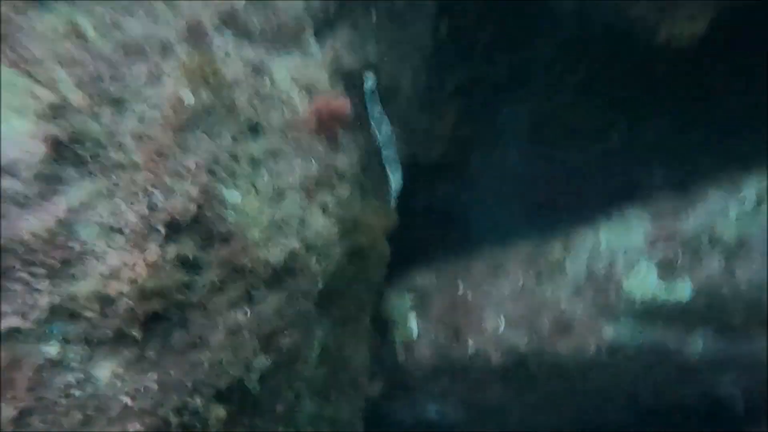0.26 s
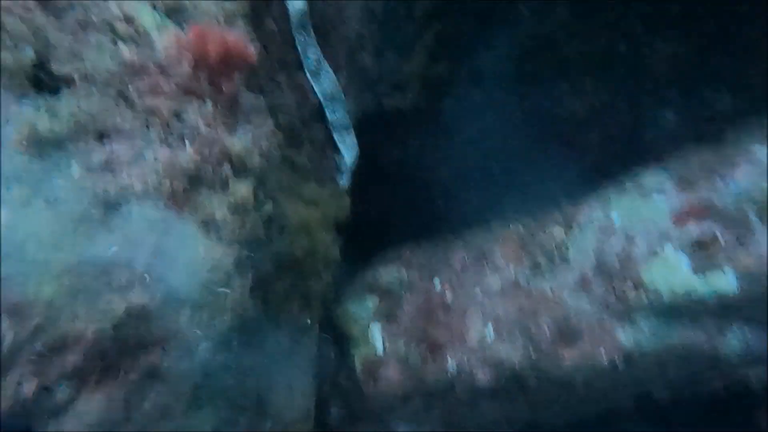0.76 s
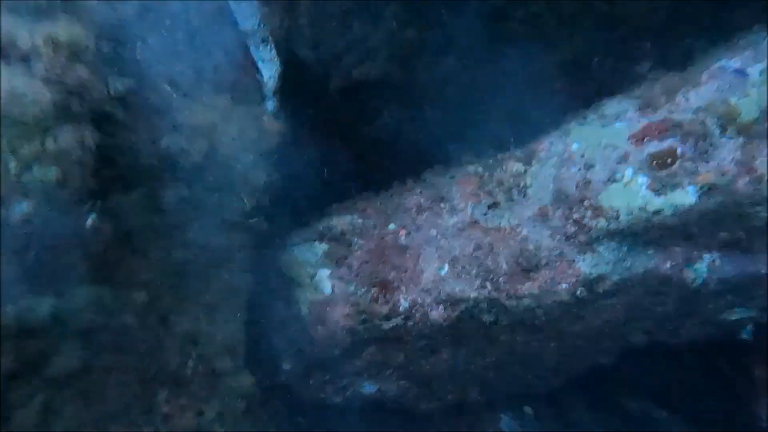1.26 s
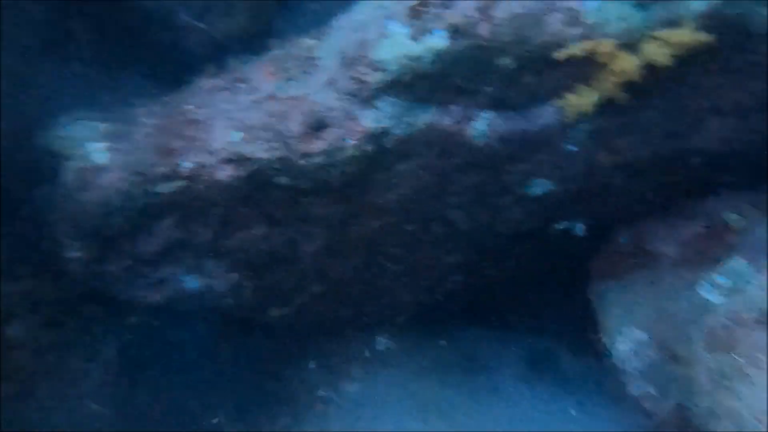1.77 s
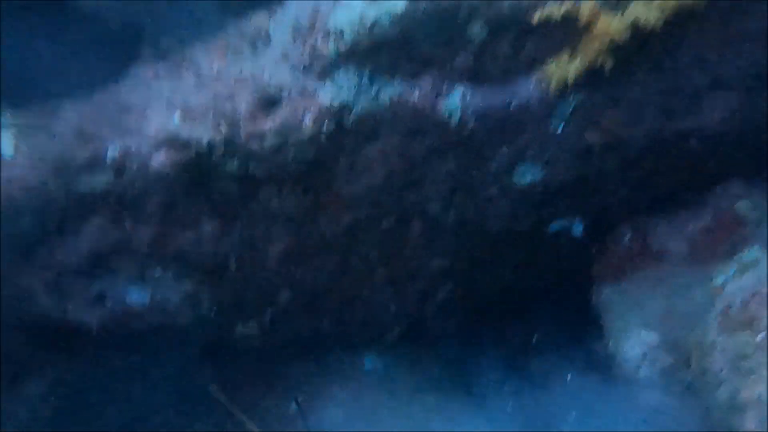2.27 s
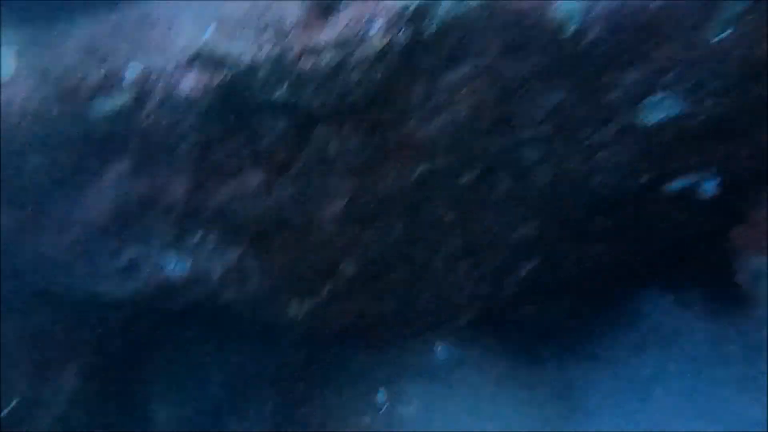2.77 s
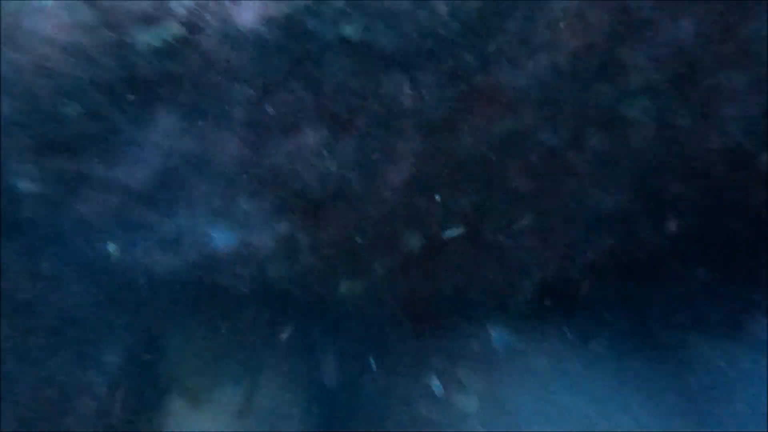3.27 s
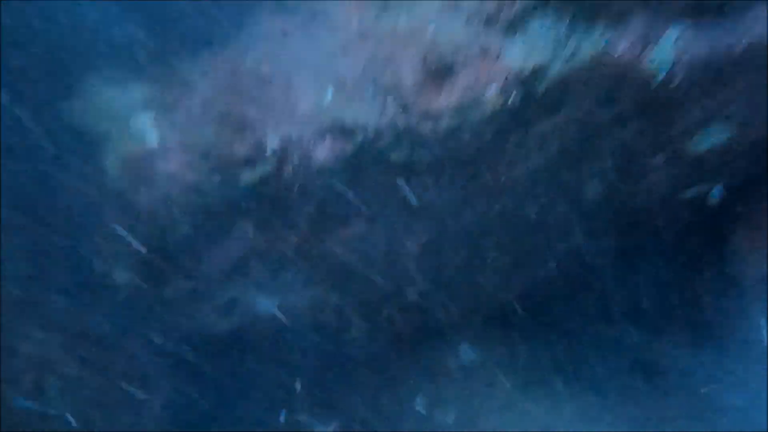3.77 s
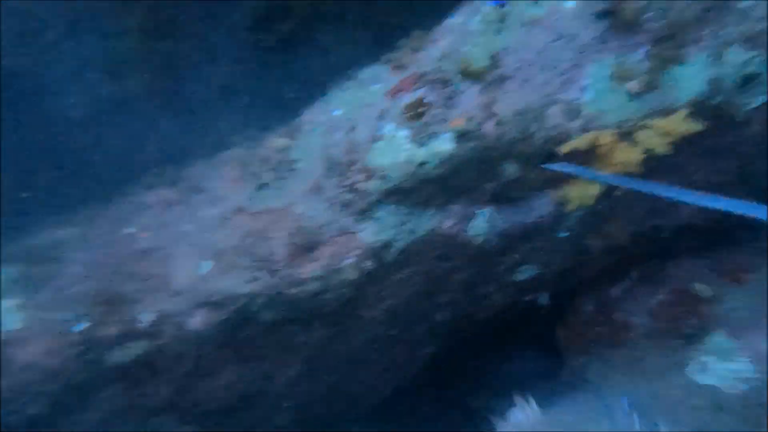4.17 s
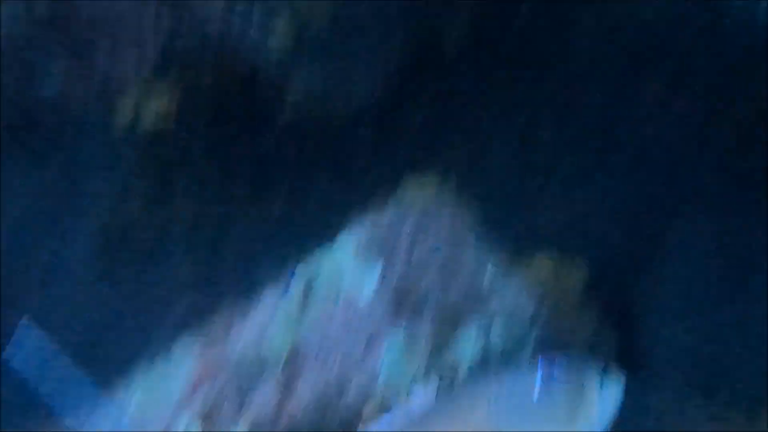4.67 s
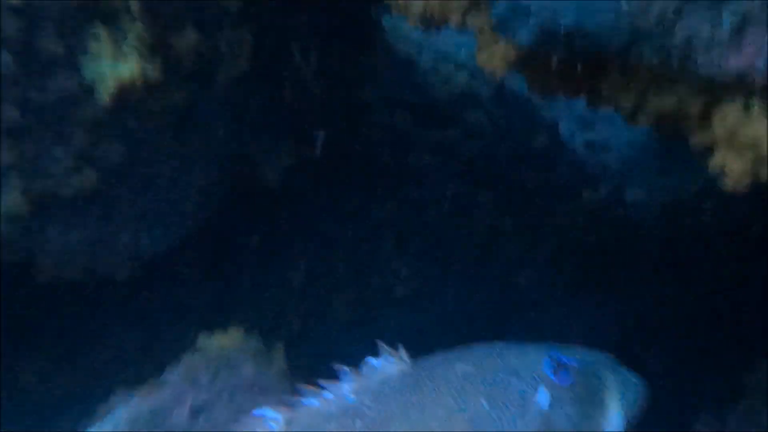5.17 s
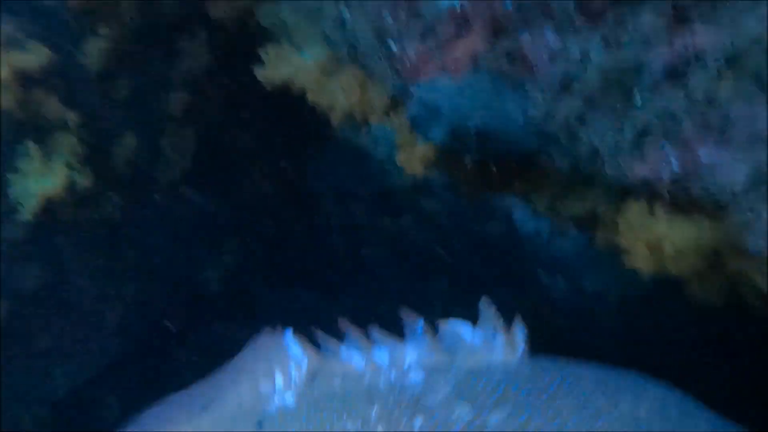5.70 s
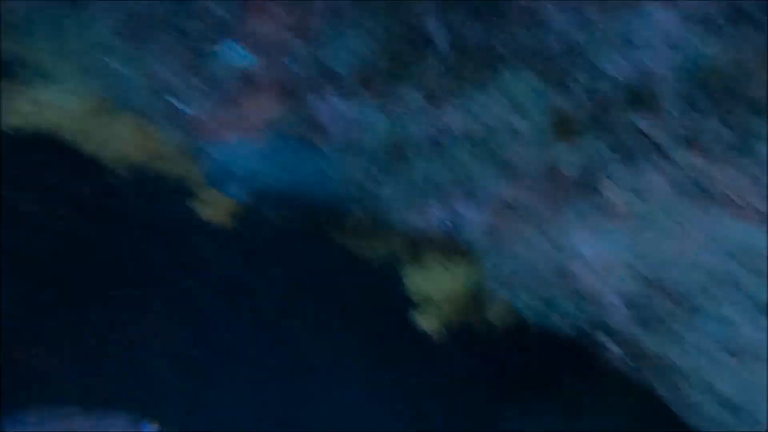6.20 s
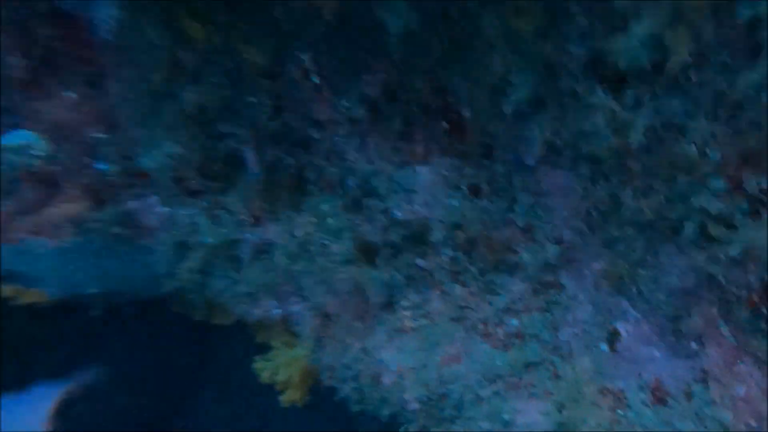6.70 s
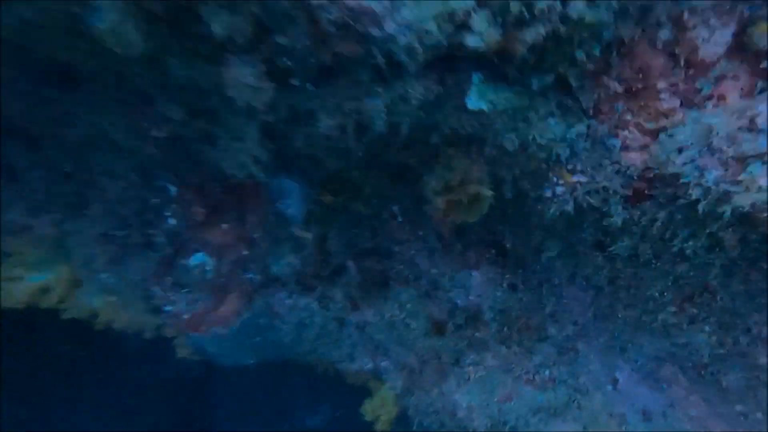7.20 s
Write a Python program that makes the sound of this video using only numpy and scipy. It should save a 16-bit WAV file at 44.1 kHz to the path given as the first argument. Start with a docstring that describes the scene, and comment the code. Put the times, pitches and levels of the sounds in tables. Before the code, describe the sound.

Underwater, a hard knock and deep thumps hit a camera case over low surging, gurgling water, with gritty scraping and sharp little clicks.

```python
"""Thumps and knocks on a waterproof camera case that a diver pushes through a gap between rocks.
Blows are short damped swings: low for the case in water, higher for its wall and its hollow.
Clicks are bursts of noise through the case's resonances; groans are wavering stick-slip tones.
Sand and gear rub with a gritty hiss of random grains, in a continuous, changing layer and in strokes.
Behind them water surges as low noise, and gurgles and booms as many small gliding gulps."""
import sys
import numpy as np
from scipy import signal
from scipy.fft import rfft, irfft
from scipy.io import wavfile
from scipy.ndimage import uniform_filter1d

SR = 44100
rng = np.random.default_rng(int(sys.argv[2]) if len(sys.argv) > 2 else 0)


def to_wav(s):
    """Save 16-bit WAV."""
    ch = np.atleast_2d(s).T  # columns
    pcm = np.round(np.clip(ch, -1, 1) * 32767)  # PCM
    wavfile.write(sys.argv[1], SR, pcm.astype(np.int16))


N = 328545
TIME_S = np.arange(N) / SR
HZ = np.fft.rfftfreq(8192, 1 / SR)

# water round the case, before trim and swell: (time [s], slow surge [dB], quicker churn [dB])
WATER_FLOW = [(0.1, -25, -33), (0.43, -29, -36), (2.69, -29.5, -37), (3.46, -36, -41.5), (3.99, -33.5, -39),
              (4.7, -31.5, -35.5), (5.22, -34.5, -42.5), (5.65, -31, -37.5), (6.27, -35.5, -46),
              (6.55, -35, -40.5), (6.85, -36, -51.5), (7.42, -33.5, -37.5)]
# background rubbing, rising and falling, before trim: (time [s], dull scrape [dB], gritty hiss [dB])
BACKGROUND_RUB = [(0.0, -46, -49.5), (0.42, -48.5, -56.5), (0.8, -51.5, -58), (1.22, -52, -56),
                  (1.6, -44.5, -52), (2.05, -54.5, -55.5), (3.15, -56, -59.5), (4.85, -55, -61),
                  (6.25, -57, -62), (7.07, -58.5, -60), (7.45, -51.5, -53)]
# strokes of rubbing: (time [s], length [s], level [dB], brightness [dB/octave])
RUB_STROKES = [(0.11, 0.025, -40, -2.5), (0.667, 0.11, -44, -1), (0.811, 0.073, -45.5, -4),
               (1.099, 0.022, -40.5, -2), (1.267, 0.17, -49.5, -4), (1.956, 0.098, -52.5, 0.5),
               (2.342, 0.42, -50, 1.5), (2.92, 0.11, -50, 1.5), (3.571, 0.15, -66, 22),
               (3.812, 0.088, -51.5, 0), (4.046, 0.077, -46, 1), (4.86, 0.19, -52, 0),
               (5.071, 0.11, -47, 0.5), (5.468, 0.12, -53, 9.5), (5.806, 0.11, -47.5, 0.5),
               (6.323, 0.085, -48.5, -3)]
# soft bumps: (time [s], nominal peak [dB], base pitch [Hz], hollow's ringing [dB])
CASE_THUMPS = [(0.3322, -11.5, 112, -42), (0.441, -11.5, 29.8, -49), (0.494, -18.5, 202, -28),
               (0.5242, -16, 50, -37), (0.711, -11.5, 58, -32), (0.7445, -7.5, 145, -14.5),
               (0.7602, -12.5, 43.3, -47), (0.8288, -14.5, 35.7, -31), (1.0176, -13.5, 109, -39),
               (1.2687, -11, 117, -29), (1.3994, -31, 150, -26), (2.098, -12, 35.2, -35),
               (2.3688, -16, 56.4, -49), (2.4616, -17, 44, -14.5), (2.7138, -7, 110.6, -14),
               (2.84, -24, 247, -26.5), (2.9254, -19.5, 183, -30.5), (3.401, -17.5, 45, -29.5),
               (3.8883, -12.5, 51, -49), (4.1353, -18.5, 125, -25.5), (4.7322, -19.5, 178, -26.5),
               (5.1078, -11.5, 52.6, -43), (5.2753, -32, 47.6, -26), (5.38, -17, 156, -32.5),
               (5.6419, -22.5, 36, -23), (5.731, -32, 290, -40), (5.802, -15, 103, -39),
               (5.954, -9, 110.6, -49), (5.975, -11, 81, -39), (6.0164, -9.5, 131, -15.5),
               (6.1575, -9, 88.3, -37.5), (6.498, -15.5, 219, -15.5), (6.8888, -18, 221, -35),
               (6.917, -12.5, 158, -17.5), (7.0205, -31, 50.3, -31), (7.119, -13, 66, -58),
               (7.2102, -17, 142, -43), (7.3009, -20, 135, -29)]
# hard, dull contacts: (time [s], nominal peak [dB], wall pitch [Hz], hollow's ringing [dB])
WALL_KNOCKS = [(0.18, -38, 920, -25), (0.335, -27, 1500, -51), (0.755, -25, 1430, -46),
               (0.832, -35, 920, -27.5), (0.8478, -19.5, 1520, -22), (0.864, -18, 1610, -19),
               (1.103, -33, 1330, -43), (1.475, -28.5, 1040, -33), (1.8465, -33, 1450, -54),
               (2.636, -33.5, 850, -39), (3.255, -35.5, 1010, -34), (4.433, -37, 1240, -33),
               (4.7317, -36, 696, -32.5), (4.837, -33, 1110, -28.5), (4.852, -28.5, 1010, -46),
               (4.871, -28, 1040, -23.5), (4.885, -37, 1030, -41), (5.591, -31.5, 1010, -34),
               (6.1458, -36.5, 1430, -48), (6.889, -39.5, 790, -30.5), (7.025, -34, 1410, -34.5),
               (7.22, -28, 1570, -59)]
# ticks of grit and gear: (time [s], nominal peak [dB], centre [Hz], scatter re crush [dB])
GRIT_CLICKS = [(0.122, -32, 5400, -12), (0.2643, -35, 5900, -11), (0.293, -33.5, 4440, -6),
               (0.332, -36.5, 4900, -14), (0.352, -30, 4900, -21), (0.4605, -31.5, 5850, -29),
               (0.5417, -31.5, 4620, -6), (0.755, -33, 5030, -24), (1.6613, -34, 4970, -1),
               (1.888, -30, 6300, -37), (1.9714, -35, 5640, -22), (2.0088, -25, 5330, -34),
               (2.4772, -31.5, 5600, -34), (2.6373, -34.5, 4600, -8), (2.929, -37.5, 4200, -16),
               (3.821, -36, 3570, -13), (4.488, -32.5, 2770, -6), (4.788, -44, 5500, -27),
               (4.829, -38, 4950, -7), (6.053, -39.5, 5850, -30), (5.637, -35, 6250, -6),
               (5.823, -20, 4870, -23), (5.924, -33, 3100, -1), (6.427, -28, 4400, -22),
               (7.025, -27.5, 4730, -22), (7.137, -33, 5800, -23), (7.2205, -24.5, 3500, -10.5),
               (7.3698, -35, 5160, -11)]
# firm rubs: (time [s], length [s], hum before pressure [dB], mean pitch [Hz], whine before pressure [dB])
CASE_GROANS = [(6.322, 0.079, -32.5, 313, -54), (6.326, 0.11, -30.5, 179, -61.5),
               (6.44, 0.36, -38.5, 210, -60.5), (7.372, 0.17, -22.5, 204, -52.5)]
# wall modes that whine: (frequency before glide [Hz], level [dB])
WHINE_MODES = [(460, -1), (930, -1.5), (1570, 0.5)]
# shifts of grip that make the case boom: (time [s], level before rise and decay [dB], decay time [s])
GRIP_SHIFTS = [(1.611, -31, 0.12), (2.824, -18, 0.027), (4.54, -34.5, 0.19)]
# colour of the surge: (frequency [Hz], gain [dB])
SURGE_COLOUR = [(10, -13.5), (22, 2.5), (48, 1.5), (75, -10.5), (130, -40.5), (500, -100)]
# colour of the dull scrape: (frequency [Hz], gain [dB])
SCRAPE_COLOUR = [(250, -15), (450, -0.5), (690, -8.5), (1100, -9), (1560, -1), (1950, -18.5), (2800, -23),
                 (12000, -92.5)]
# colour of gritty hiss and crackle: (frequency [Hz], gain [dB])
GRIT_COLOUR = [(900, -25), (2000, -7), (2900, 0.5), (4200, -2.5), (7200, -6.5), (8800, -6), (9900, -23),
               (12800, -26), (15000, -66)]
# resonances of the case: (frequency [Hz], width [Hz], lift [dB])
CASE_MODES = [(810, 30, 5), (950, 127, 6.5), (1440, 510, 2), (3350, 330, 5), (5022, 270, 17.5),
              (6060, 460, 7.5), (7020, 560, 8)]
# stereo spread: (frequency [Hz], side re mid [dB])
SIDE_RE_MID = [(100, -43), (260, -29.5), (600, -3), (1400, -12.5), (2400, 0), (4500, -9), (9000, -11.5)]
# stereo balance: (frequency [Hz], left re right [dB])
LEFT_RE_RIGHT = [(150, 0), (450, 2), (740, -1), (1300, 0), (2500, 4.5), (3400, 3), (5200, -2), (8000, 2),
                 (12000, 0)]

# trims
SURGE_DB, CHURN_DB, SCRAPE_DB, HISS_DB = 4, 5.5, 1, 1.5
# boom when the churn column is at CHURN_REF_DB; share of that column's dB changes it follows
BOOM_DB, BOOM_FOLLOWS, CHURN_REF_DB = -44.5, 0.62, -36
GRIP_RISE_S = 0.096
# hollow of the case: base pitch, time to peak
HOLLOW_HZ, HOLLOW_RISE_S = 310.2, 0.0071
# a bump's envelope peaks after this many cycles of its base pitch
RISE_CYCLES = 0.81
# waver of the whine's pitch, rms share
WALL_WAVER = 0.028
BAND_LIMIT_HZ = 15700


def amp(db):
    """Decibels to gain."""
    return 10 ** (np.asarray(db) / 20)


def evened(x):
    """Scales to rms 1."""
    return x / np.sqrt(np.mean(x ** 2) + 1e-20)


def read(points, hz):
    """Reads a spectrum table on a log-frequency axis."""
    f, value = np.transpose(points)
    return np.interp(np.log(hz + 1), np.log(f + 1), value)


def level(table, axis):
    """One dB column of a time table as a gain for every sample."""
    columns = np.transpose(table)
    return amp(np.interp(TIME_S, columns[0], columns[axis]))


def add(mix, time_s, sound):
    """Mixes a sound in at the given time."""
    part = mix[max(round(time_s * SR), 0):][:len(sound)]
    part += sound[:len(part)]


def colour(x, db):
    """Minimum-phase filter with the given gain over HZ: resonances ring after each impulse."""
    log_gain = np.log(amp(np.maximum(db, db.max() - 100)))
    circle = np.concatenate([log_gain, log_gain[-2:0:-1]])
    response = np.exp(np.conj(signal.hilbert(circle)))
    taps = np.fft.ifft(response).real[:len(HZ)]
    return signal.oaconvolve(x, taps)[:len(x)]


def wander(rate_hz):
    """Smooth random drift of rms 1, mostly slower than the rate."""
    hz = np.fft.rfftfreq(N, 1 / SR)
    shape = hz / (hz + 2) * np.exp(-(hz / rate_hz) ** 2)
    return evened(irfft(rfft(rng.standard_normal(N)) * shape, N))


def hump(centre_hz, octaves):
    """A broad resonance as a gain over HZ."""
    return np.exp(-(np.log2((HZ + 1) / centre_hz) / octaves) ** 2)


def case_db():
    """The case's resonances as a dB gain over HZ: each mode lifts a band round its frequency."""
    lift = sum((amp(db) - 1) / np.hypot(1, 2 * (HZ - hz) / width_hz) ** 2
               for hz, width_hz, db in CASE_MODES)
    return 20 * np.log10(1 + lift)


def swing(hz, u, sag):
    """Damped cycles whose envelope peaks where u is 1, their pitch sagging as they go."""
    turns = np.cumsum(hz * (1 + sag * np.tanh(1 - u))) / SR
    return (u * np.exp(1 - u)) ** 2 * np.sin(2 * np.pi * turns)


def gurgle(centre_hz, octaves, cycles, spread_db, count, glide=0.19):
    """Separate gulps of water at uneven times, each with its own pitch, glide and strength."""
    out, t = np.zeros(N), np.arange(SR // 8) / SR
    chances = 2 * np.tanh(rng.standard_normal((count, 4)) / 2)
    for k, (late, pitch, size, bend) in enumerate(chances):
        hz = centre_hz * 2 ** (octaves * pitch)
        time_s = (k + late / 2) / count * N / SR
        add(out, time_s, amp(spread_db * size) * swing(hz, t * hz / cycles, glide * bend))
    return evened(out)


def handling():
    """Gain of the case's boom: a little with the churning water, more after each shift of grip."""
    push = amp(BOOM_DB) * (level(WATER_FLOW, axis=2) / amp(CHURN_REF_DB)) ** BOOM_FOLLOWS
    for time_s, db, decay_s in GRIP_SHIFTS:
        t = np.maximum(TIME_S - time_s, 0)
        push = np.hypot(push, amp(db) * np.minimum(t / GRIP_RISE_S, 1) * np.exp(-t / decay_s))
    return push


def water():
    """Slow pressure swings, gulping eddies and the hollow's higher gurgle, all swelling together."""
    swell = amp(2.02 * wander(rate_hz=13.2))
    surge = evened(colour(rng.standard_normal(N), read(SURGE_COLOUR, HZ)))
    surge = amp(SURGE_DB) * level(WATER_FLOW, axis=1) * surge
    churn = gurgle(centre_hz=103.2, octaves=0.47, cycles=0.72, spread_db=4.5, count=420)
    churn = amp(CHURN_DB) * level(WATER_FLOW, axis=2) * churn
    boom = handling() * gurgle(centre_hz=275.0, octaves=0.28, cycles=1.46, spread_db=4.0, count=900)
    return swell * (surge + churn + boom)


def grains(per_s, spread_db, smooth):
    """Tiny impacts of very unequal size over a smooth sliding noise."""
    size = amp(spread_db * np.minimum(rng.exponential(1, N), 4))
    hits = size * rng.choice([-1, 1], N) * (rng.random(N) < per_s / SR)
    return evened(evened(hits) + smooth * rng.standard_normal(N))


def patchy(x, depth_db, size):
    """The point of contact keeps shifting, so patches of the spectrum swell and fade."""
    z = signal.stft(x, nperseg=size)[2]
    patches = uniform_filter1d(rng.standard_normal(z.shape), size=5, axis=0)
    patches = uniform_filter1d(patches, size=4, axis=1)
    return evened(signal.istft(z * amp(depth_db * evened(patches)), nperseg=size)[1][:N])


def rubbing(arch=0.22, peak_early=0.18, ring=0.98):
    """Grains catch and slip in spurts and ring the case; each stroke swells, crackles and eases off."""
    spurts = wander(rate_hz=28)
    coarse = grains(per_s=500, spread_db=2.5, smooth=1.0)
    coarse = coarse * amp(2.9 * spurts + 1.4 * wander(rate_hz=49))
    fine = grains(per_s=780, spread_db=7, smooth=1.6) * amp(2.8 * spurts)
    crackle = grains(per_s=760, spread_db=10.0, smooth=0.86) * amp(2.6 * wander(rate_hz=17.6))
    grit_db = read(GRIT_COLOUR, HZ)
    scrape = patchy(colour(coarse, read(SCRAPE_COLOUR, HZ) + case_db()), depth_db=3.5, size=1024)
    hiss = patchy(colour(fine, grit_db + case_db()), depth_db=3.3, size=512)
    loose = patchy(colour(crackle, grit_db + ring * case_db()), depth_db=4, size=512)
    out = amp(SCRAPE_DB) * level(BACKGROUND_RUB, axis=1) * scrape
    out += amp(HISS_DB) * level(BACKGROUND_RUB, axis=2) * hiss
    for time_s, length_s, db, bright_db in RUB_STROKES:
        u = np.linspace(0, 1, round(max(length_s, .01) * SR))
        start = rng.integers(N // 2)
        sand = evened(scrape[start:][:len(u)]) + evened(loose[start:][:len(u)])
        # finer grains shift the sound upwards
        sand = colour(sand, bright_db * np.log2(np.clip(HZ, 1500, 12000)))
        pressure = abs(np.sin(np.pi * u ** peak_early)) ** arch
        pressure = pressure * np.minimum(u * length_s / .008, 1)
        add(out, time_s, amp(db) * evened(pressure * sand))
    return out


def groans(glide=0.0776, glide_s=0.0213, waver=0.029, rough_db=5.5, catch_s=0.0072, overtone_db=-8):
    """Stick-slip sustains a low, wavering tone; the wall's modes whine and rise as the rub tightens."""
    out, slips = np.zeros(N), wander(rate_hz=50)

    def tone(hz, unsteady, flutter_db):
        """A sine of rms 1 whose pitch and strength waver with the slips."""
        bend, grip = (slips[start:][:len(hz)] for start in rng.integers(N // 2, size=2))
        turns = np.cumsum(hz * (1 + unsteady * bend)) / SR
        return evened(amp(flutter_db * grip) * np.sin(2 * np.pi * turns))

    for time_s, length_s, db, hz, whine_db in CASE_GROANS:
        t = np.arange(round(length_s * SR)) / SR
        tighten = 1 - glide * np.exp(-t / glide_s)
        # each whining mode is a pair of unsteady tones that beat together
        whine = sum(amp(mode_db) * tone(mode_hz * tighten, WALL_WAVER, rough_db)
                    for mode_hz, mode_db in 2 * WHINE_MODES)
        hum = tone(np.full(len(t), hz), waver, rough_db)
        hum = hum + amp(overtone_db) * tone(HOLLOW_HZ * tighten, waver, rough_db)
        pressure = np.minimum(t / catch_s, 1) * (1 - (t / length_s) ** 2)
        add(out, time_s, pressure * (amp(db) * hum + amp(whine_db) * whine))
    return out


def contact(body_db, focus, crush_s, tail_db, tail_s):
    """A brief crush of grit and its scatter off the rocks, heard through the case; peak about 1."""
    t = np.arange(SR // 10) / SR
    u = t / crush_s
    envelope = u * np.exp(1 - u) + amp(tail_db) * np.exp(-t / tail_s)
    force = rng.standard_normal(len(t)) * envelope
    sound = colour(force, body_db + 20 * np.log10(focus))
    # loudest 2.5 ms sets the scale
    return sound / np.sqrt(2 * uniform_filter1d(sound ** 2, SR // 400).max())


def clicks():
    """Sharp contacts that ring the high resonances and scatter grit."""
    out = np.zeros(N)
    body = [(400, -5.0), (2500, 4.0), (8000, -0.5), (10000, -8.5), (13000, -14), (15000, -44.0)]
    body_db = read(body, HZ) + 0.79 * case_db()
    for time_s, db, hz, scatter_db in GRIT_CLICKS:
        focus = hump(hz, octaves=0.82) + amp(-21)
        tick = contact(body_db, focus, crush_s=0.0012, tail_db=scatter_db, tail_s=0.029)
        add(out, time_s, amp(db) * tick)
    return out


def knocks(rise_cycles=1.7, upper_ratio=1.696, upper_db=-15, ring_db=-25, ring_s=0.0051,
           hollow_hz=450, hollow_rise_s=0.0027):
    """Blunt blows ring two wall modes, the lower lingering, and the hollow; they crush a little grit."""
    out, t = np.zeros(N), np.arange(SR // 10) / SR
    body_db = read([(300, -22), (900, 8.5), (1850, 17.0), (2200, -8), (12000, -45)], HZ)
    for time_s, db, hz, hollow_db in WALL_KNOCKS:
        u = t * hz / rise_cycles
        wall = swing(hz, u, 0) + amp(upper_db) * swing(hz * upper_ratio, u, 0)
        wall = wall + amp(ring_db) * swing(hz, t / ring_s, 0)
        focus = hump(hz, octaves=0.7) + amp(-16)
        grit = amp(-9) * contact(body_db, focus, crush_s=.0013, tail_db=-15, tail_s=.012)
        hollow = amp(hollow_db) * swing(hollow_hz, t / hollow_rise_s, 0)
        add(out, time_s, amp(db) * (wall + grit) + hollow)
    return out


def thumps(sag=0.08, push_db=-9, detune=0.11):
    """Bumps swing the water-damped case and ring its hollow, at a slightly random pitch each time."""
    out, t = np.zeros(N), np.arange(SR // 6) / SR
    offsets = 2 * rng.random(len(CASE_THUMPS)) - 1
    for (time_s, db, hz, ring_db), offset in zip(CASE_THUMPS, offsets):
        u = t * hz / RISE_CYCLES
        # the bump also shoves the water once, there and back
        push = amp(push_db) * u ** 2 * (1 - u / 2) * np.exp(2 - 1.5 * u)
        hollow = swing(HOLLOW_HZ * (1 + detune * offset), t / HOLLOW_RISE_S, sag)
        add(out, time_s, amp(db) * (swing(hz, u, sag) + push) + amp(ring_db) * hollow)
    return out


def scene():
    """Both microphones share the bass; higher up, each hears the ringing wall in its own phase."""
    mid = water() + rubbing() + groans() + clicks() + knocks() + thumps()
    # 6 ms fade-out
    mid = mid * np.clip((TIME_S[-1] - TIME_S) / .006, 0, 1)
    z = signal.stft(colour(mid, read(SIDE_RE_MID, HZ)), nperseg=256)[2]
    scrambled = z * np.exp(2j * np.pi * rng.random(z.shape))
    side = np.sqrt(2) * signal.istft(scrambled)[1][:N]
    half_lean_db = read(LEFT_RE_RIGHT, HZ) / 2
    return np.array([colour(mid + side, half_lean_db), colour(mid - side, -half_lean_db)])


def record(dry):
    """The camera's band limit: a steep low-pass."""
    taps = signal.firwin(511, BAND_LIMIT_HZ, window=("kaiser", 9), fs=SR)
    return signal.oaconvolve(dry, taps[None], "same")


dry = scene()
out = record(dry)
to_wav(out)
```